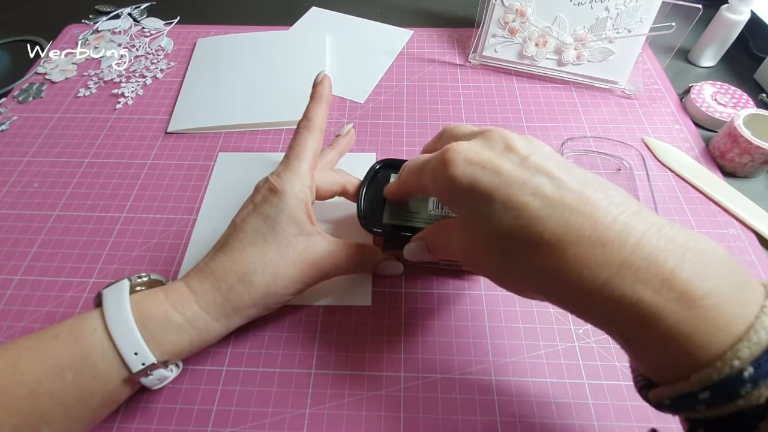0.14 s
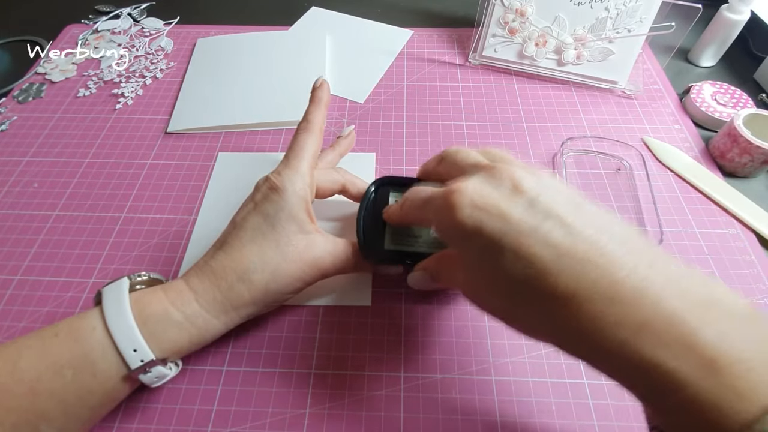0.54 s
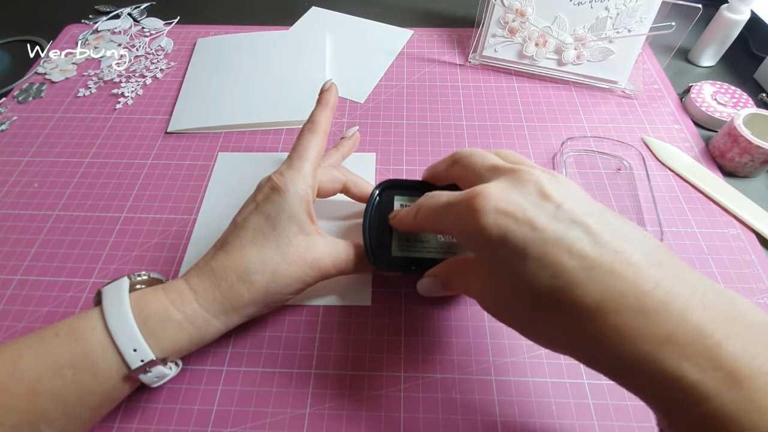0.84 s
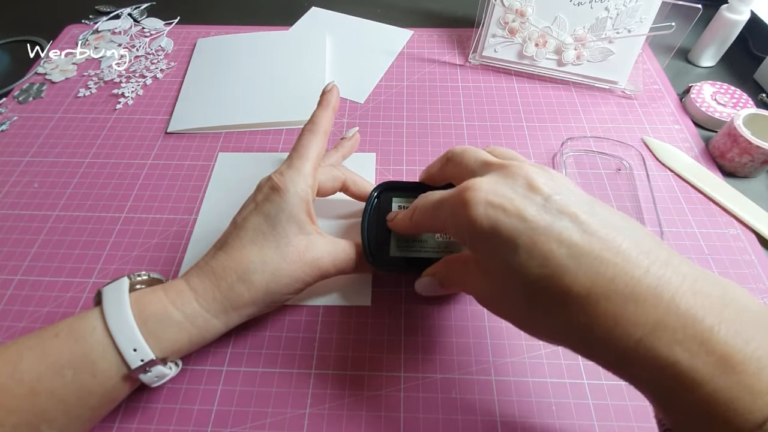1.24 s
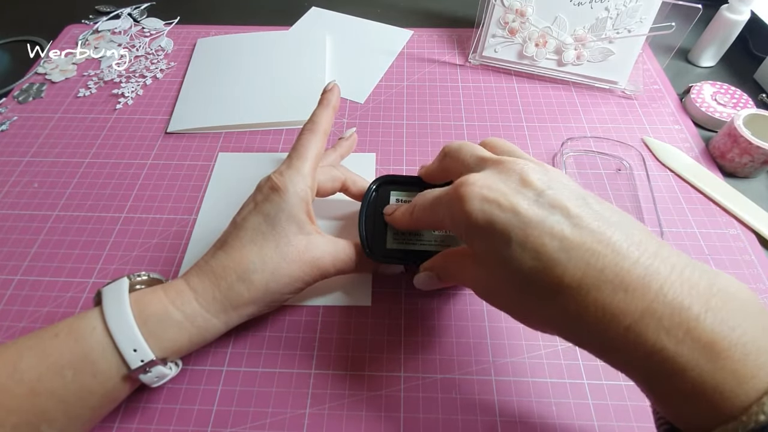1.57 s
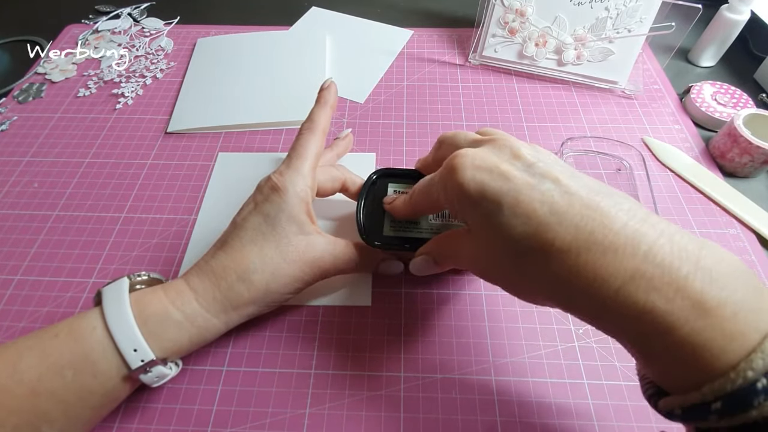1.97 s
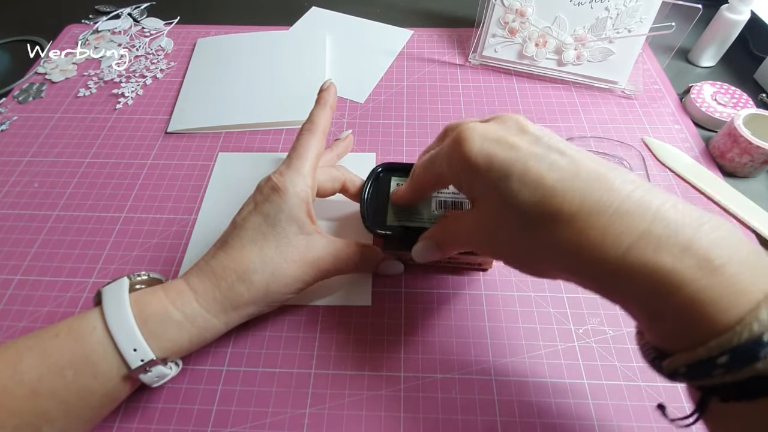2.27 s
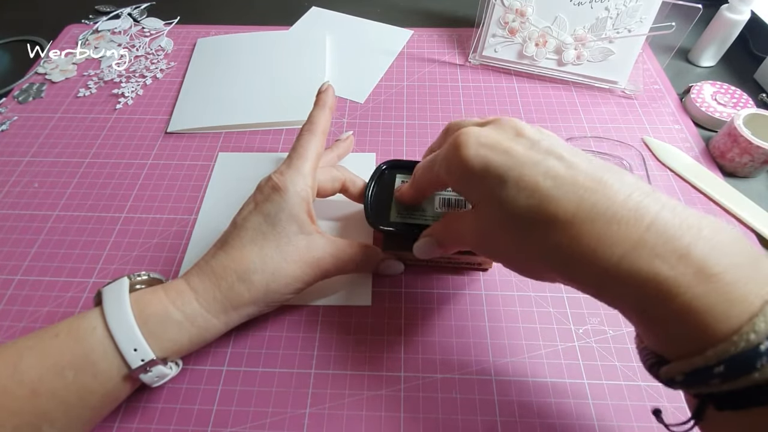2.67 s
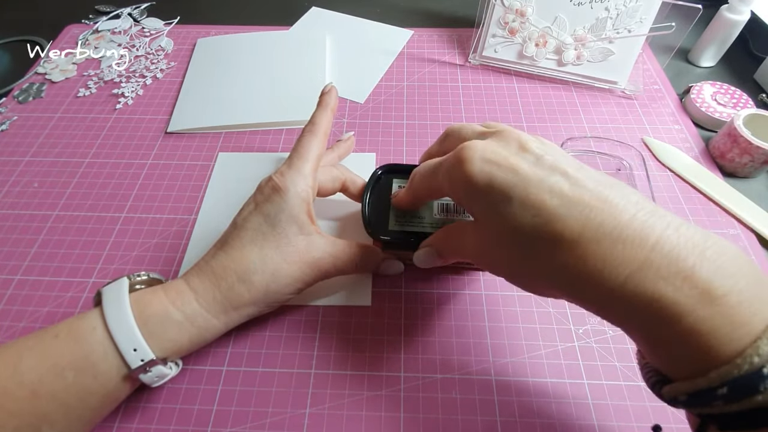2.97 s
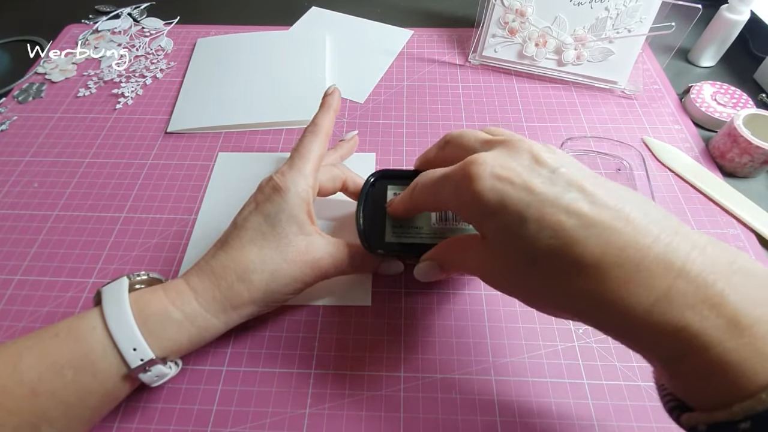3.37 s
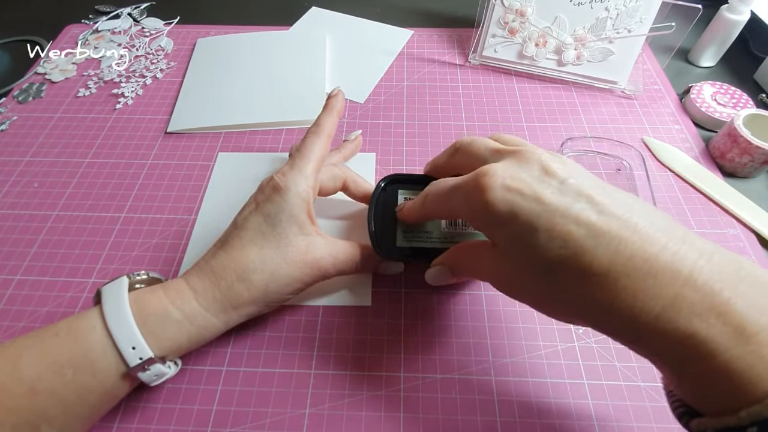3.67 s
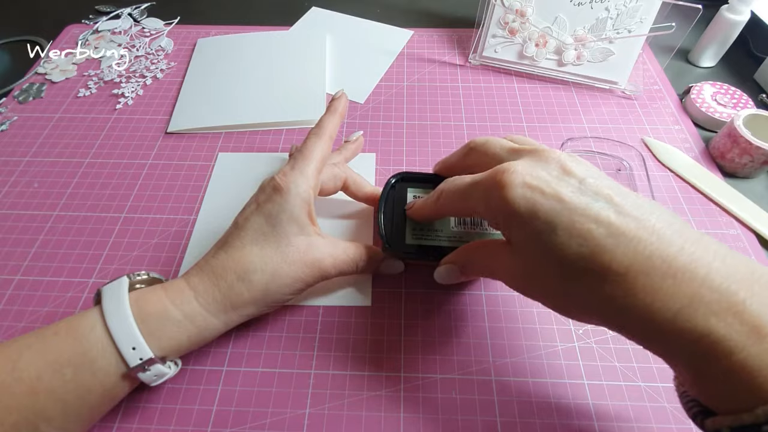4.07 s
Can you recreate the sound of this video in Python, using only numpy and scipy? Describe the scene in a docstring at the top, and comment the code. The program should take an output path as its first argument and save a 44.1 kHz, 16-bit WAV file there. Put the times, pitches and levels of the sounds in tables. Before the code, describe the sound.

An ink pad in a plastic case is dabbed onto a wooden stamp on a craft table. Each dab gives a dull thump with a small wooden knock and a plastic tick. A quick run of taps thins to a few scattered knocks while a sleeve brushes faintly, then the steady dabbing resumes. The microphone is just above the table in a small, quiet room.

```python
"""An ink pad in a plastic case is dabbed repeatedly onto a wooden stamp on a craft table.
Each dab thumps the table top through its cutting mat, knocks the wood block and ticks the case;
now and then the hard rim bumps the block. A fingernail clicks once; a sleeve brushes as the arm shifts.
A small room answers; a phone just above the table hears it over faint rumble and hiss."""
import sys
import numpy as np
from scipy import signal
from scipy.fft import rfft, irfft
from scipy.io import wavfile

SR = 44100
rng = np.random.default_rng(int(sys.argv[2]) if len(sys.argv) > 2 else 0)


def store_wav(level_fs):
    """Save 16-bit WAV to argv[1]."""
    pcm = np.round(np.clip(np.atleast_2d(level_fs), -1, 1) * 32767)
    wavfile.write(sys.argv[1], SR, pcm.T.astype(np.int16))


N = 186146
TIME_S = np.arange(N) / SR
RING_S = np.arange(int(.6 * SR)) / SR  # time axis of one impact

# dabs: (time [s], force [dB], contact [ms], case share of knock [0-1], share landing late by tilt [0-1])
DABS = [(-.0145, -1.5, 3.6, 0.2, 0), (.165, -2, 0.89, 0.29, 0.02), (.399, 3.5, 0.76, 0.37, 0.02),
        (.635, 0.5, 3.2, 0.4, 0.47), (0.8326, 2, 6.3, 0.62, 0.22), (1.0158, -2.5, 3.4, 0.54, 0.5),
        (1.2003, .5, 1.3, 0.43, 0.12), (1.4787, -0.5, 0.36, 0.06, 0.01), (2.341, -5, 13.6, 0.1, 0.1),
        (2.701, -19.5, 5.4, 0.5, 0), (3.015, 0, 23, 0.86, .1), (3.276, -9.5, 5.8, 0.7, 0),
        (3.5064, -2.5, 5.2, 0.56, 0), (3.7026, -4.5, 2.8, 0.2, 0.13), (3.891, -1.5, 1.86, .62, 0.04),
        (4.0918, -5, 3.6, 0.17, 0.07)]
# contact noise on wood: (frequency [Hz], density [dB])
WOOD_SPECTRUM = [(120, -5), (280, 6), (450, -6), (570, -5), (730, -3), (1050, -13.5), (1500, -49),
                 (3000, -32.5)]


def dabs():
    """Force sets the thump; shorter contact gives a louder knock, shared by wood and case."""
    out = np.zeros((2, N))
    soft_ms = 1.7
    for start_s, force_db, contact_ms, case_share, tilt in DABS:
        knock_db = force_db + 2.5 - 10 * np.log10(1 + contact_ms / soft_ms)
        wood_db, case_db = knock_db + 10 * np.log10([1 - case_share, case_share])
        edge_db = -10.5 + 0.24 * force_db
        out += blow(start_s, force_db, contact_ms, wood_db, case_db, edge_db, tilt)
    return out


def rim_knocks():
    """The hard rim bumps the block with little weight: much knock, little thump."""
    # rim bumps: (time [s], knock [dB])
    bumps = [(1.9078, 2), (2.179, -22), (3.0328, -9.5)]
    return sum(blow(start_s, thump_db=db - 8, contact_ms=1.7,
                    wood_db=db, case_db=db - 5, edge_db=db - 30, tilt=0.013)
               for start_s, db in bumps)


def blow(start_s, thump_db, contact_ms, wood_db, case_db, edge_db, tilt):
    """The pad crushes its felt, lands on one edge, thumps the table and rocks flat."""
    out = np.zeros((2, N))
    rock_s = .012
    add(out, start_s - RING_S[-1], undb(-42.5 + 0.59 * wood_db) * felt_crush())
    add(out, start_s, undb(thump_db) * table_thump(contact_ms))
    for at_s, share in ((start_s, 1 - tilt), (start_s + rock_s, tilt)):
        add(out, at_s, np.sqrt(share) * contact(contact_ms, wood_db, case_db, edge_db))
    return out


def table_thump(contact_ms):
    """The table top rings; a longer push excites its high modes less."""
    # table modes: (frequency [Hz], level [dB], t60 [s], polarity under the phone [+1/-1])
    modes = [(48.84, -26, 0.34, -1), (53.47, -26, 0.22, 1), (79.6, -28.5, 0.15, 1),
             (120.36, -27.5, .23, -1), (137.3, -29.5, 0.075, 1), (167.2, -39.5, 0.27, -1),
             (195.3, -33, 0.12, -1), (201.7, -42, 0.3, 1), (234.8, -54, 0.59, 1), (261, -42, 0.17, -1),
             (304, -57, 0.3, 1), (329, -49, 0.28, -1), (403.3, -65.5, 0.73, 1), (432.6, -55, 0.19, -1)]
    return sum(np.sign(polarity) * ring(hz, db, t60_s) / (1 + (hz * contact_ms / 1e3) ** 2)
               for hz, db, t60_s, polarity in modes)


def contact(contact_ms, wood_db, case_db, edge_db):
    """Pad meets stamp: block and case swell over the contact time, the hard edge ticks at once."""
    # block and case modes: (frequency [Hz], relative level [dB], t60 [s])
    wood_modes = [(500, -3, 0.12), (723, -5.5, 0.096), (730, 2, 0.048), (830, -6, 0.092), (1164, -12, 0.21)]
    case_modes = [(1450, -33, .06), (1460, -22, .04), (1437, 8.5, 0.073), (1954, 16, 0.018),
                  (2233, 4, 0.08)]
    # contact noise of case and edge: (frequency [Hz], density [dB])
    case_spectrum = [(500, 1.5), (1000, -1.5), (1450, 0.5), (2050, -7.5), (2500, -16.5), (4500, -34),
                     (9000, -22)]
    edge_spectrum = [(1200, -14), (2600, -1), (5400, 0), (6800, -6), (8500, -16), (16000, -22)]
    wood = undb(-50) * knock(wood_modes, scatter_db=4.5, detune=0.012)
    wood = wood + undb(-39.5) * crack(WOOD_SPECTRUM, 0.014, room_db=-16, early_db=-11, early_t60_s=0.17)
    case = undb(-66.5) * knock(case_modes, scatter_db=-0.5, detune=0.0043)
    case = case + undb(-36.5) * crack(case_spectrum, 0.018, room_db=-20.5, early_db=-19.5, early_t60_s=.11)
    edge = undb(-48) * crack(edge_spectrum, 0.0064, room_db=-21, early_db=3, early_t60_s=0.043)
    press = 1 - np.exp(-2 * RING_S * 1e3 / contact_ms)
    return press * (undb(wood_db) * wood + undb(case_db) * case) + undb(edge_db) * edge


def knock(modes, scatter_db, detune):
    """A small body rings, slightly differently at each strike."""
    draws = rng.standard_normal((len(modes), 2))
    return sum(ring(hz * (1 + detune * pitch_draw), db + scatter_db * level_draw, t60_s)
               for (hz, db, t60_s), (pitch_draw, level_draw) in zip(modes, draws))


def crack(spectrum, t60_s, room_db, early_db, early_t60_s, room_t60_s=0.55):
    """Noise burst at the contact, then near reflections and the diffuse room tail."""
    direct = noise(spectrum, side=0.33) * decay(t60_s)
    tail = undb(early_db) * decay(early_t60_s) + undb(room_db) * decay(room_t60_s)
    build_up = 1 - np.exp(-RING_S / 0.0051)
    return direct + noise(spectrum, side=0.073) * tail * build_up


def felt_crush(rise_s=0.001):
    """Inky felt crushes: dull noise swells until the pad bottoms out."""
    swell = np.exp(-RING_S[::-1] / rise_s)
    return lowpass(noise(WOOD_SPECTRUM, side=0.69) * swell, hz=2210)


def lingering_hiss(peak_s=0.028):
    """Faint hiss rises and sinks after each dab."""
    # hiss: (frequency [Hz], density [dB])
    spectrum = [(1200, -8), (2400, -3), (5000, -1), (7500, -6), (15000, -3.5)]
    power = 0
    for start_s, force_db, *_ in DABS:
        age = np.maximum(TIME_S - start_s, 0) / peak_s
        power += undb(-68.5 + 0.56 * force_db) ** 2 * age * np.exp(1 - age)
    return np.sqrt(power) * noise(spectrum, side=0.22, size=N)


def nail_click(start_s=0.1378):
    """A fingernail clicks once on the case."""
    out = np.zeros((2, N))
    click = noise([(3000, -23), (6000, 6), (11500, -2), (15000, -12)], side=.2)
    add(out, start_s, undb(-46) * click * decay(t60_s=0.0029))
    return out


def sleeve():
    """Cloth slides in small catches as the arm moves, slightly to the right."""
    # arm strokes: (start [s], length [s], hiss [dB], rub [dB])
    strokes = [(1.2, 0.092, -71, -60.5), (1.511, 0.2, -64, -59.5), (2.139, .24, -68.5, -59),
               (2.528, 0.13, -76, -69)]
    # cloth hiss and low rub: (frequency [Hz], density [dB])
    hiss_spectrum = [(400, -14), (1000, 3), (2200, -5), (4000, -1), (6300, -3.5), (8000, -13),
                     (15000, -14.5)]
    rub_spectrum = [(120, 4.5), (270, -1.5), (360, 2.5), (520, -6.5), (800, -10), (1500, -22), (3000, -64)]
    hiss_gain, rub_gain = sum(np.outer(undb(levels_db), arm_stroke(start_s, length_s))
                              for start_s, length_s, *levels_db in strokes)
    catch_s = np.arange(0, TIME_S[-1], .012)
    catch_db = 2.7 * np.interp(TIME_S, catch_s, rng.standard_normal(len(catch_s)))
    hiss = hiss_gain * noise(hiss_spectrum, side=0.057, size=N)
    rub = rub_gain * noise(rub_spectrum, side=0.16, size=N)
    pan_db = np.array([[-0.5], [0.5]])
    return undb(catch_db + pan_db) * (hiss + rub)


def arm_stroke(start_s, length_s, attack_s=0.024, swell_db=4.5, release_t60_s=0.82):
    """Envelope of one arm movement: sets in, gathers speed, dies away."""
    age_s = TIME_S - start_s
    attack = np.clip(age_s / attack_s, 0, 1)
    swell = undb(swell_db * (np.clip(age_s / length_s, 0, 1) - 1))
    release = np.exp(-np.log(1000) * np.maximum(age_s - length_s, 0) / release_t60_s)
    return attack * swell * release


def room_floor():
    """Steady room rumble and microphone hiss."""
    # rumble and hiss: (frequency [Hz], density [dB])
    spectrum = [(18, -19), (32, 5), (65, -3), (120, -12.5), (200, -14.5), (340, -26), (480, -29),
                (800, -30), (1400, -31), (2300, -37.5), (3600, -33), (5300, -33), (7500, -38.5),
                (15000, -36.5)]
    return undb(-57.5) * noise(spectrum, side=0.39, size=N)


def noise(spectrum, side, size=len(RING_S)):
    """Coloured stereo noise; long waves reach both microphone ports alike."""
    # port difference in diffuse sound: (frequency [Hz], side level [dB])
    spread = [(40, -23), (200, -5), (600, -7), (1800, -7), (3000, -3), (4000, -10), (5400, -10), (7500, 0),
              (15000, -2)]
    pair = colour(rng.standard_normal((2, size)), spectrum)
    mid, difference = pair / np.sqrt(np.mean(pair ** 2))
    difference = colour(difference, spread)
    return mid + side * np.array([difference, -difference])


def ring(hz, db, t60_s):
    """One struck mode."""
    return undb(db) * np.sin(2 * np.pi * hz * RING_S) * decay(t60_s)


def decay(t60_s):
    """Free decay after a blow."""
    return np.exp(-np.log(1000) * RING_S / t60_s)


def colour(x, spectrum):
    """Filter by (frequency [Hz], gain [dB]) points."""
    hz, db = np.transpose(spectrum)
    bin_hz = np.maximum(np.fft.rfftfreq(x.shape[-1], 1 / SR), 1)
    gain = undb(np.interp(np.log(bin_hz), np.log(hz), db))
    return irfft(rfft(x) * gain, x.shape[-1])


def lowpass(x, hz):
    """Low-pass filter: the treble falls away above hz."""
    return signal.sosfilt(signal.butter(4, hz, fs=SR, output="sos"), x)


def undb(db):
    """Decibels to gain."""
    return 10 ** (np.asarray(db) / 20)


def add(out, start_s, sound):
    """Mix a sound in at start_s."""
    at = int(round(start_s * SR)) + np.arange(sound.shape[-1])
    inside = (at >= 0) & (at < N)
    out[:, at[inside]] += sound[..., inside]


def scene():
    """Dabs, rim knocks, nail click and sleeve over the quiet room."""
    impacts = lowpass(dabs() + rim_knocks(), hz=7670)
    return impacts + lingering_hiss() + nail_click() + sleeve() + room_floor()


def record(dry, cutoff_hz=15800):
    """The right port is more sensitive above the bass; the phone cuts the top."""
    # port imbalance: (frequency [Hz], left minus right [dB])
    imbalance = [(70, -.2), (140, -.6), (260, -2.1), (600, -3.4), (1300, -3.9), (2700, -5.4), (3600, -1.1),
                 (5400, -.5), (6700, -2.2), (7800, -6.7), (12000, -7.2), (15000, -4.8)]
    left = colour(dry[0], [(hz, db / 2) for hz, db in imbalance])
    right = colour(dry[1], [(hz, -db / 2) for hz, db in imbalance])
    top_cut = signal.ellip(10, .2, 80, cutoff_hz, fs=SR, output="sos")
    return signal.sosfilt(top_cut, np.array([left, right]))


dry = scene()
out = record(dry)
store_wav(out)
```